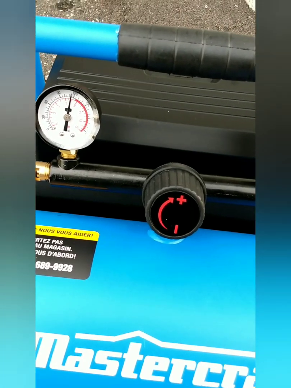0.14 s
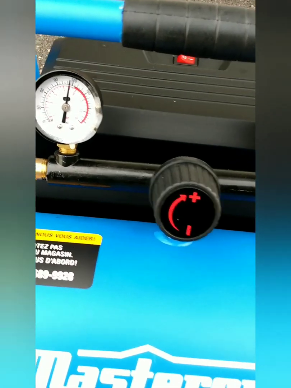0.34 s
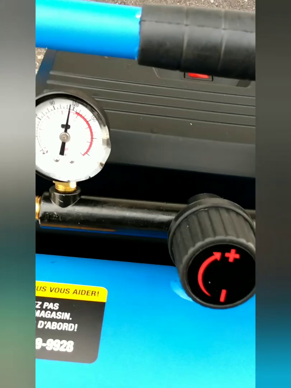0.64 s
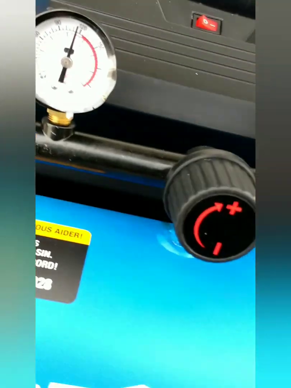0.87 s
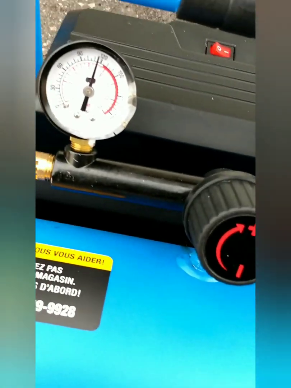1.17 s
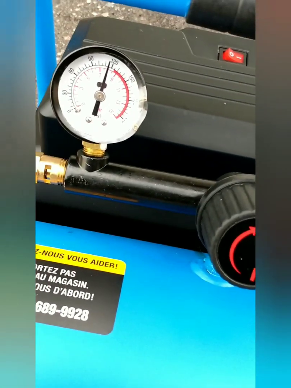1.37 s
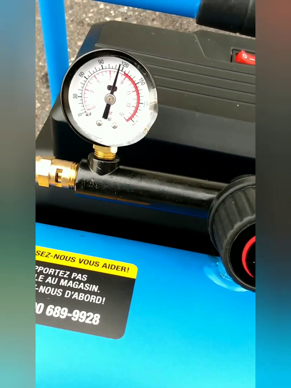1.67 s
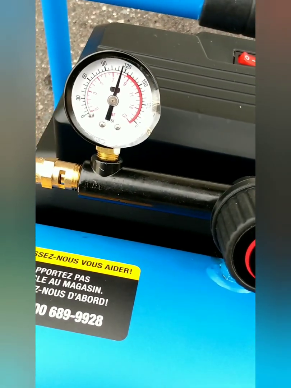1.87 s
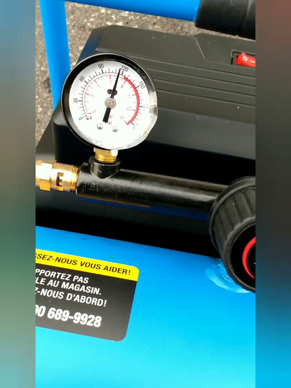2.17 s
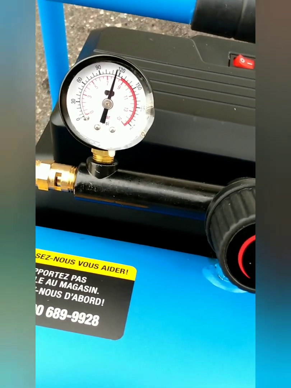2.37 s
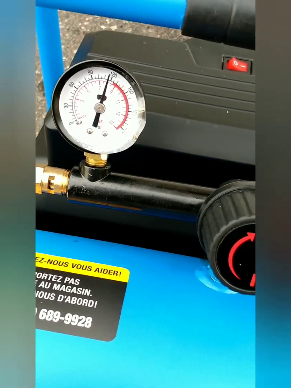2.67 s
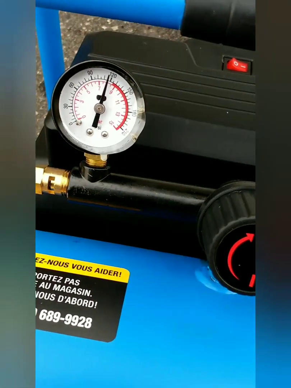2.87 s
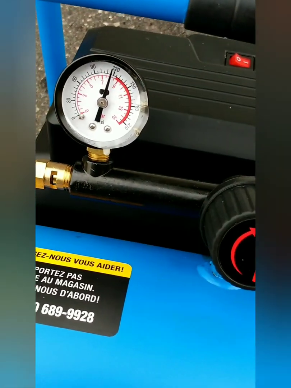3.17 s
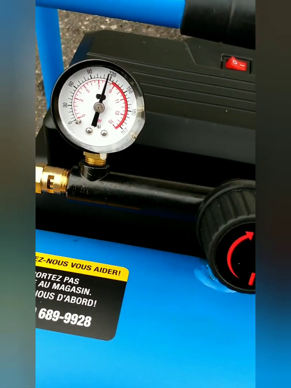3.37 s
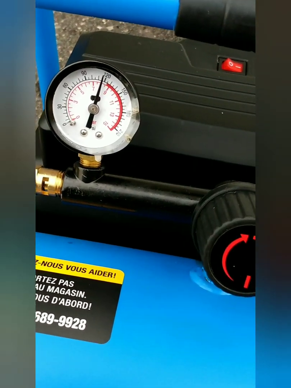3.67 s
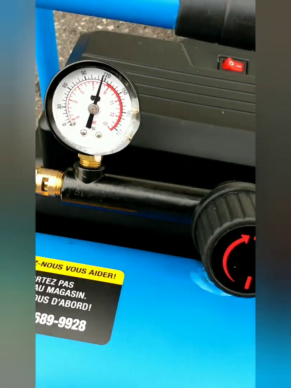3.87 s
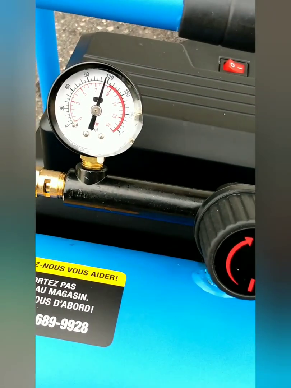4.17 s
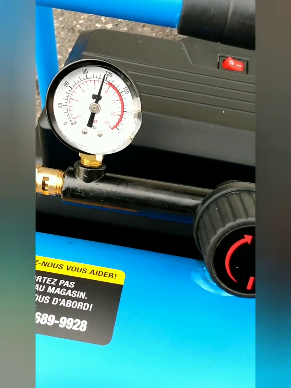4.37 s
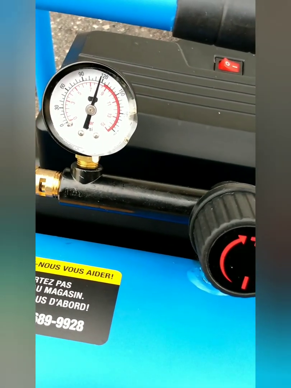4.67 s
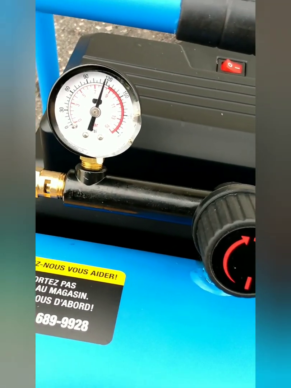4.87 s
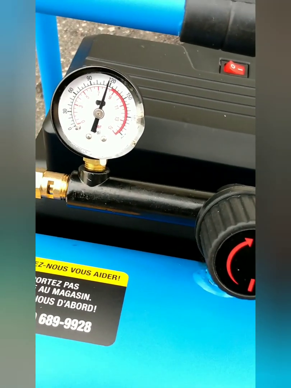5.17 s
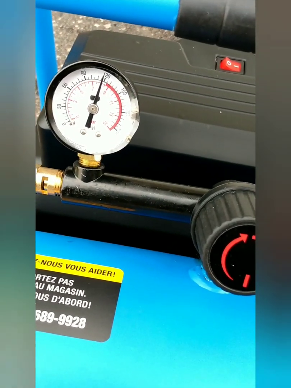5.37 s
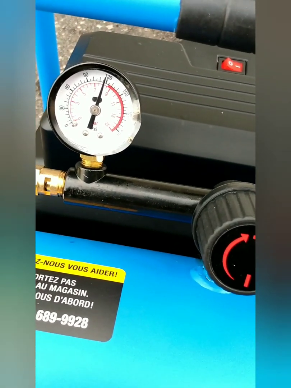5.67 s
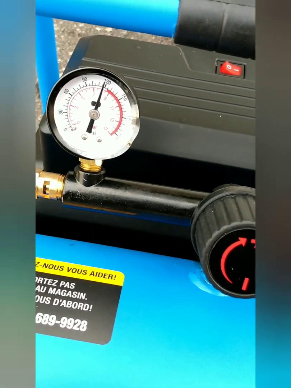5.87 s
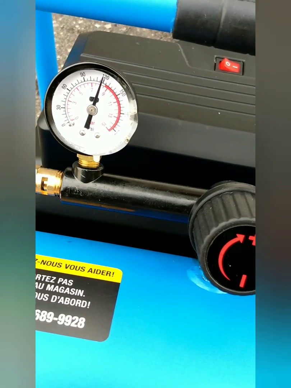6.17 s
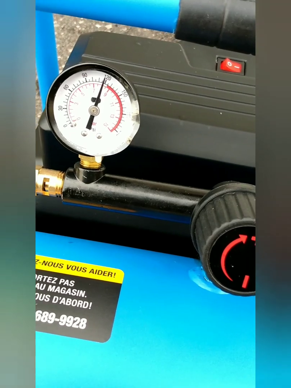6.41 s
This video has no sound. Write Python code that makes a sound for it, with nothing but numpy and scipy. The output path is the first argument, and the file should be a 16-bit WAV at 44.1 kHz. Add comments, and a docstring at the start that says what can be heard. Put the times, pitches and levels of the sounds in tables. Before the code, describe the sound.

From 0 s a small oil-less air compressor is already at full, steady speed. A fixed low hum, with a motor turn near 95 per second and a strong tone near 380 Hz, sits under a dense, rapid clatter whose bursts blur into a coarse buzz. Slightly uneven knocks ring the cover and metal body in the middle range, while broad fan air hisses and rushes around them. A pump stroke about 17 times a second and mains ripple add a quick, shallow throb. From about 0.25 to 1.1 s the microphone leans in: the colour shifts and the mid clatter becomes more direct, while a thin whine near 4 kHz stands out briefly around 0.6 s. It eases back slightly by 2 s, then stays close and constant until the sound ends at about 6.5 s, still running. Dry, mono, with nothing above roughly 8 kHz.

```python
"""A small oil-less air compressor runs steadily; the listener starts standing back from it.
In the first second they lean in over the motor cover, and a thin whine stands out for a moment on the way.
They then ease back a little and stay close: each motor turn gives hum, from summed sines, and a burst of clatter,
from sines lined up in time. Uneven knocks ring the body as filtered noise, and shaped noise hisses as cooling air.
A slower pump stroke and the mains ripple make the sound throb throughout."""
import sys
import numpy as np
from scipy import signal
from scipy.fft import rfft, irfft, next_fast_len
from scipy.io import wavfile

SR = 44100
rng = np.random.default_rng(int(sys.argv[2]) if len(sys.argv) > 2 else 0)


def transcribe(u):
    """Save the signal u as a 16-bit wav file named by the first command-line argument.

    u: samples, shape (n,) or (channels, n), limited to [-1, 1]; the rate is SR.
    q: integer samples, one column per channel.
    """
    v = np.clip(np.atleast_2d(u).T, -1, 1)
    q = np.round(v * 32767).astype(np.int16)
    wavfile.write(sys.argv[1], SR, q)


N = 288394
TIME = np.arange(N) / SR   # seconds
MOTOR_HZ, STROKE_HZ, RIPPLE_HZ = 95.108, 17.3, 120   # motor turns, pump strokes, mains ripple
START_TURN = 0.12   # shaft position at the start, in turns


def from_db(db):
    """Decibels to gain."""
    return 10 ** (np.asarray(db) / 20)


def rms_one(x):
    """Scale to rms 1."""
    return x / np.sqrt(np.mean(x ** 2) + 1e-20)


def in_time(rows):
    """The columns of a curve at every sample."""
    seconds, *columns = np.transpose(rows)
    return [np.interp(TIME, seconds, column) for column in columns]


def at_hz(points, hz):
    """Read a table on a log-frequency axis."""
    table_hz, value = np.transpose(points)
    return np.interp(np.log(hz + 1e-9), np.log(table_hz), value)


def drift(rate_hz):
    """Slow chance with spread 1: noise through two equal one-pole lowpasses, run at every 40th sample."""
    step = 40
    pole = np.exp(-2 * np.pi * rate_hz * step / SR)
    settle = 2000   # discarded while the filter settles
    noise = rng.standard_normal(N // step + 2 + settle)
    slow = signal.lfilter([1], [1, -2 * pole, pole * pole], noise)[settle:]
    return np.interp(np.arange(N) / step, np.arange(len(slow)), rms_one(slow))


def tone(cycles):
    """A sine of rms 1 on a running count of cycles."""
    return np.sqrt(2) * np.cos((2 * np.pi * (cycles % 1)).astype(np.float32))


def resonate(x, hz, width_hz):
    """A resonance applied twice, for steep skirts; rms 1."""
    b, a = signal.iirpeak(hz, hz / width_hz, fs=SR)
    once = signal.lfilter(b, a, x)
    return rms_one(signal.lfilter(b, a, once))


# The whine stands out for a moment. One row: centre in seconds, length in seconds, rise in dB.
WHINE_SWELL = (.58, .17, 5.7)


def whine(distance, hz, close_db, back_db, waver_cycles, waver_rate_hz):
    """A thin whine, weaker close by; the weaker it is, the more its phase wavers."""
    centre_s, length_s, rise_db = WHINE_SWELL
    swell = np.exp(-(2 * (TIME - centre_s) / length_s) ** 4)
    lift_db = back_db * distance + rise_db * swell
    waver = waver_cycles * from_db(-lift_db) * drift(waver_rate_hz)
    return from_db(close_db + lift_db) * tone(hz * TIME + waver)


# Rush of the cooling air, before it is chopped and swayed. Each row: frequency in Hz, level in dB per Hz.
AIR_SPECTRUM = [(25.0, -81.5), (80.0, -66), (130.0, -70.5), (300.0, -67), (600.0, -68.5), (2100.0, -67.5),
                (4500.0, -70.5), (5400.0, -74), (7500.0, -72), (7750.0, -80.5), (8000.0, -92.5),
                (8500.0, -103.7)]
# Colour of air and knocks when standing back. Each row: frequency in Hz, change in dB.
BACK_COLOUR = [(400, 1), (1000, 0.5), (1500, -2), (2200, -3), (2800, -1), (3900, -3), (4600, 4.5),
               (5400, -1), (7000, 0.6)]


def cooling_air(turns, distance, level_db, chop_db, stroke_db, flicker_db):
    """Broad fan noise, chopped by the rotor and swayed by the pump stroke and the mains ripple."""
    size = next_fast_len(N)
    hz = np.arange(size // 2 + 1) * SR / size
    white = rfft(rng.standard_normal(size))
    spectrum = white * from_db(at_hz(AIR_SPECTRUM, hz)) * np.sqrt(SR / 2)
    close = irfft(spectrum, size)[:N]
    back = irfft(spectrum * from_db(at_hz(BACK_COLOUR, hz)), size)[:N]
    rush = close + distance * (back - close)

    chop = tone(4 * turns) + 0.6 * tone(5 * turns + rng.random())
    stroke = tone(STROKE_HZ * TIME)
    sway = 0.5 * stroke + stroke * tone(turns) + 0.68 * tone(RIPPLE_HZ * TIME - turns)
    moving_db = chop_db * chop + stroke_db * sway + flicker_db * drift(7.4)
    return rush * from_db(level_db + moving_db)


def cover_buzz(drive, turns, distance, hz, width_hz, level_db, back_db, stroke_db, ripple_db,
               chance_db, chance_rate_hz, stroke_lag, ripple_lead):
    """Clatter drives one mode of the cover, which swells when pump stroke and mains ripple push together."""
    stroke = tone(STROKE_HZ * TIME - stroke_lag)             # lag and lead in cycles
    ripple = tone(RIPPLE_HZ * TIME - turns + ripple_lead)
    push_db = stroke_db * stroke + ripple_db * ripple
    swell = from_db(push_db + chance_db * np.tanh(drift(chance_rate_hz)))
    around_mean = swell / np.mean(swell) - 1                 # only the departure from the average swell
    return from_db(level_db + back_db * distance) * resonate(drive, hz, width_hz) * around_mean


# Resonances of cover, pump head and tank.
# Each row: frequency in Hz, width in Hz, close-by level in dB before the layer's trim.
BODY_MODES = [(416, 79, -36), (828.6, 56, -34), (1002, 144, -27.5), (1120, 140, -34.5), (1324, 280, -34.5),
              (1503, 87, -29), (1617, 94, -38.5), (1890, 120, -38), (2215, 55, -44), (2468, 280, -41.5),
              (2668, 190, -39.5), (2800, 430, -39.5), (3376, 28, -51.5), (3803, 420, -47), (3991, 134, -41),
              (4185, 51, -47), (6160, 150, -46.5), (6510, 150, -45), (6890, 79, -45), (7250, 290, -53.5),
              (7290, 80, -44.5)]
# The highs of each burst mostly come later than its lows, for knocks and clatter alike.
# Each row: frequency in Hz, moment of arrival in turns.
BURST_ARRIVAL = [(400, 0.4267), (900, 0.4896), (1150, 0.548), (1500, 0.751), (2500, .88), (3500, .8),
                 (4200, 1.0), (7000, 1.3)]


def knocks(turns, turn_hz, distance, level_db, burst_db, uneven_db, stroke_db):
    """Once a turn a rough knock of uneven strength rings the body, harder on the pump's stroke."""
    force_db = uneven_db * drift(30) + stroke_db * tone(STROKE_HZ * TIME)
    out = np.zeros(N)
    for hz, width_hz, db in BODY_MODES:
        build_up = min(turn_hz / (np.pi * width_hz), 0.3)    # turns; a narrow resonance swells after the knock
        depth_db = burst_db * min(1500 / hz, 1)              # the highs rattle on through the whole turn
        pulse = tone(turns - at_hz(BURST_ARRIVAL, hz) + build_up)
        burst = from_db(force_db + depth_db * pulse)
        ring = resonate(burst * rng.standard_normal(N), hz, width_hz)
        out += from_db(db + distance * at_hz(BACK_COLOUR, hz)) * ring
    return from_db(level_db) * out


# Higher multiples of the motor speed, the part of the clatter that repeats on every turn.
# Each row: multiple, close-by level in dB before the layer's trim, change when standing back in dB.
CLATTER_TONES = [(9, -30.8, -1), (10, -26.2, 0), (11, -27.4, -1), (12, -31.8, -1), (13, -37.6, -4),
                 (14, -37.0, -7), (15, -33.3, -3), (16, -31.4, -4), (17, -37.6, -3), (18, -47.7, 3),
                 (19, -47.0, -1), (20, -45.1, -4), (21, -48.5, 3), (22, -48.1, 7), (23, -40.3, 1),
                 (24, -50.1, 7), (25, -39.6, 1), (26, -35.1, -8), (27, -47.7, -1), (28, -43.2, -2),
                 (29, -40.8, -4), (30, -39.6, -9), (31, -41.0, -3), (32, -50.1, 4), (34, -42.6, -6),
                 (35, -41.1, -4), (36, -43.7, -1), (37, -42.7, -4), (39, -46.9, 0), (40, -50.5, -4),
                 (41, -52.3, 0), (46, -53.6, -2), (58, -52.7, -9), (65, -50.9, -5), (67, -47.2, -9),
                 (68, -47.6, 0), (69, -48.0, 3), (71, -50.0, 2), (72, -48.4, 0), (74, -53.2, -4)]


def clatter(turns, turn_hz, distance, level_db, scatter, jitter, flutter_db, uneven_db):
    """The repeating burst: multiples that line up near one moment of the turn; the casing smears the highs."""
    # summing arrival over the multiples gives the phase, in cycles, that delays each part of the burst
    lag = np.cumsum(at_hz(BURST_ARRIVAL, turn_hz * np.arange(1, 100)))
    shaken = turns + jitter * drift(25)          # no two turns take quite the same time
    flutter = [drift(7) for _ in range(5)]       # each multiple follows one of five
    out = np.zeros(N)
    for multiple, db, back_db in CLATTER_TONES:
        k = int(round(multiple))
        level_flutter_db = flutter_db * flutter[rng.integers(len(flutter))]
        gain = from_db(db + back_db * distance + level_flutter_db)
        smear = scatter * min(k * turn_hz / 2400, 1) ** 2 * rng.standard_normal()   # cycles
        out += gain * tone(k * shaken - lag[k - 1] + smear)
    return from_db(level_db + uneven_db * drift(40)) * out


# Low multiples of the motor speed.
# Each row: multiple, close-by level in dB before the layer's trim, change when standing back in dB.
HUM_TONES = [(1, -23, 1), (2, -33.5, 2.5), (3, -32, -0.5), (4, -14.5, -1.5), (5, -28, 0.5), (6, -42, 4),
             (7, -41.5, -9), (8, -37.5, -6)]
# Weaker tones that beat against the multiples. Each row: frequency in Hz, level in dB before the trim.
BEATING_TONES = [(267.8, -49.5), (302.8, -41.5), (363.4, -45), (397.0, -38.5), (405.1, -36.5),
                 (457.6, -56.5), (492.6, -56.5), (500.6, -59), (682.3, -54.5), (722.7, -54), (777.9, -47),
                 (912.5, -38), (1219.3, -50.5), (2014.7, -48.5), (2740.1, -53), (3750.8, -46)]


def hum(turns, distance, level_db, beating_db, waver_db):
    """Unbalance and pulsing air give clean low tones; weaker ones beat against them."""
    clean = np.zeros(N)
    for multiple, db, back_db in HUM_TONES:
        clean += from_db(db + back_db * distance) * tone(round(multiple) * turns + rng.random())
    beating = np.zeros(N)
    for hz, db in BEATING_TONES:
        wander = 0.035 * drift(3.2)   # cycles
        beating += from_db(db) * tone(hz * TIME + rng.random() + wander)
    throb_db = waver_db * (tone(STROKE_HZ * TIME) + tone(RIPPLE_HZ * TIME - turns))
    return from_db(level_db + throb_db) * clean + from_db(beating_db) * beating


# The listener leans in during the first second, then eases back a little.
# Each row: time in seconds, distance (1 = standing back, 0 = close, below 0 = closer still).
LISTENER_DISTANCE = [(.25, 1.0), (.82, 0), (1.1, -0.16), (2.0, 0.054)]


def scene():
    """All layers share one shaft, at a steady speed, and one listener distance."""
    turns = START_TURN + MOTOR_HZ * TIME
    distance, = in_time(LISTENER_DISTANCE)
    thin = whine(distance, hz=4004, close_db=-41.0, back_db=4.0, waver_cycles=0.18, waver_rate_hz=12.0)
    air = cooling_air(turns, distance, level_db=0.0, chop_db=1.08, stroke_db=0.55, flicker_db=0.6)
    rattle = knocks(turns, MOTOR_HZ, distance, level_db=-0.12, burst_db=2.0, uneven_db=1.03, stroke_db=0.5)
    # scatter in cycles, jitter in turns
    burst = clatter(turns, MOTOR_HZ, distance, level_db=0.2, scatter=0.14, jitter=0.00059,
                    flutter_db=0.46, uneven_db=0.02)
    buzz = cover_buzz(burst, turns, distance, hz=1512, width_hz=220, level_db=-29.0, back_db=-4.0,
                      stroke_db=1.5, ripple_db=1.5, chance_db=6.0, chance_rate_hz=31,
                      stroke_lag=0.06, ripple_lead=0.36)
    low = hum(turns, distance, level_db=0.04, beating_db=0.0, waver_db=0.195)
    return (thin + air + buzz + rattle + burst + low)[None]


def record(dry):
    """A steep elliptic lowpass cuts the top above 8400 Hz."""
    lowpass = signal.ellip(10, 0.1, 80, 8400, fs=SR, output="sos")   # order, ripple dB, stopband dB, Hz
    return signal.sosfilt(lowpass, dry)


dry = scene()
out = record(dry)
transcribe(out)
```